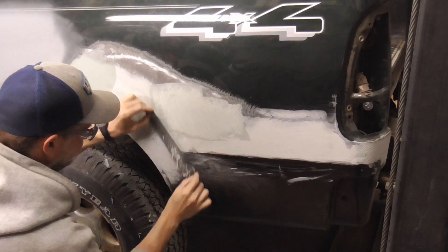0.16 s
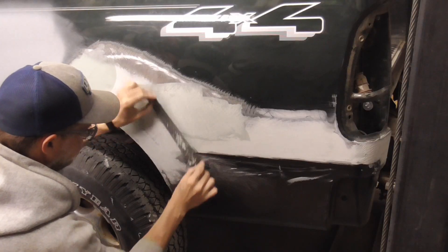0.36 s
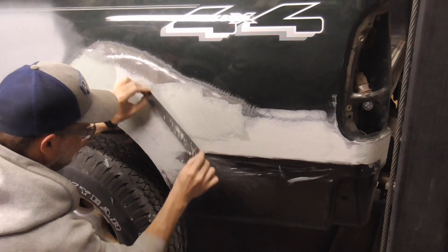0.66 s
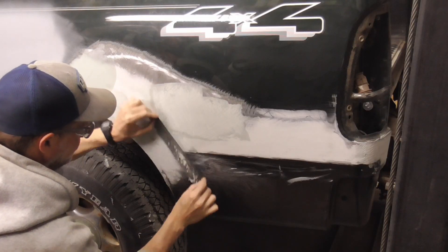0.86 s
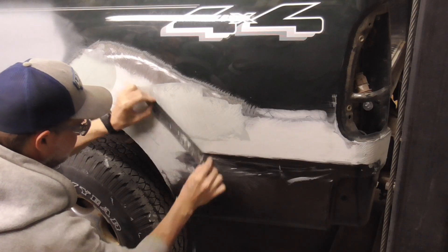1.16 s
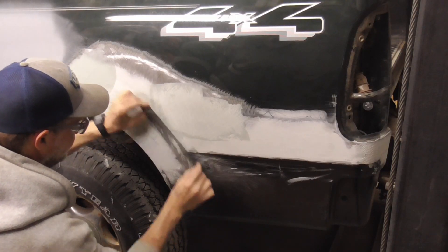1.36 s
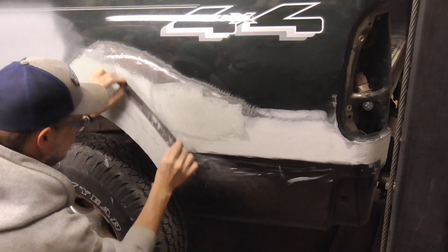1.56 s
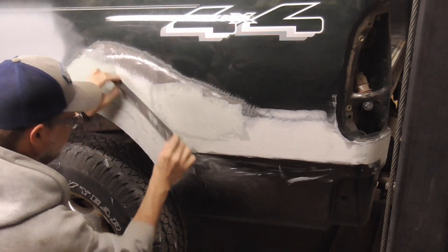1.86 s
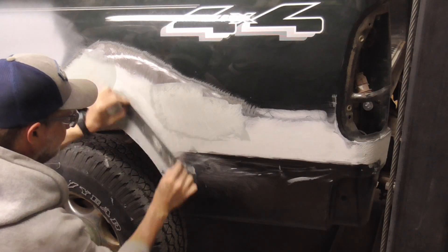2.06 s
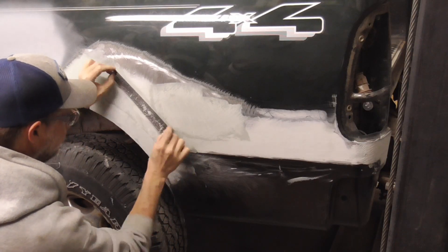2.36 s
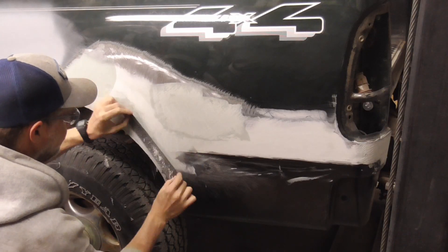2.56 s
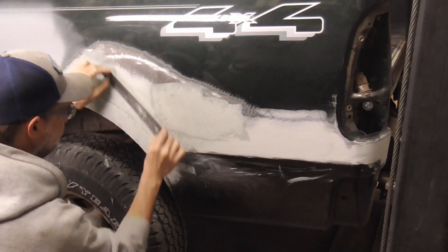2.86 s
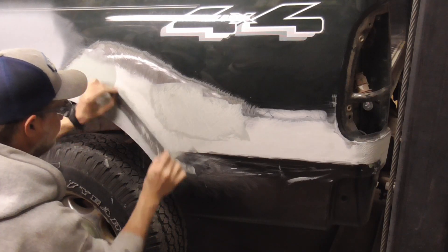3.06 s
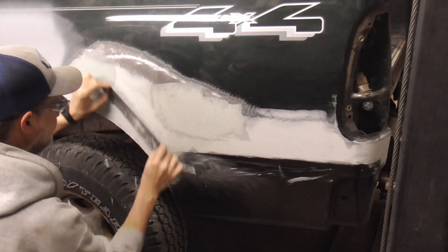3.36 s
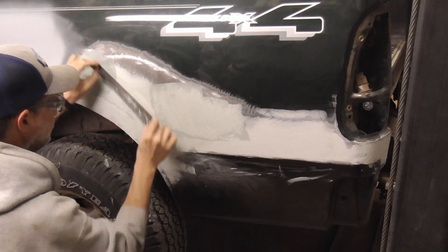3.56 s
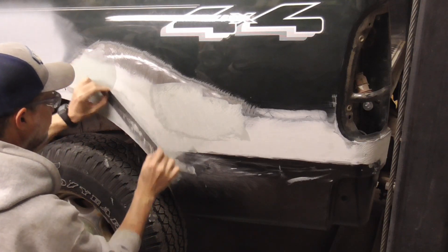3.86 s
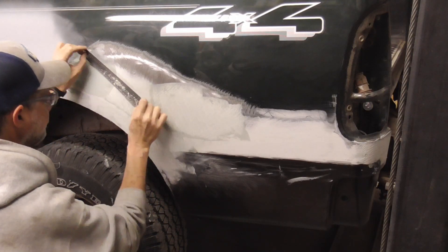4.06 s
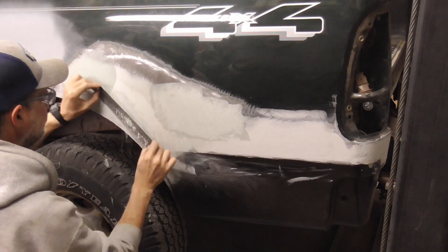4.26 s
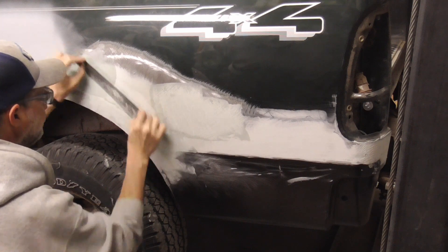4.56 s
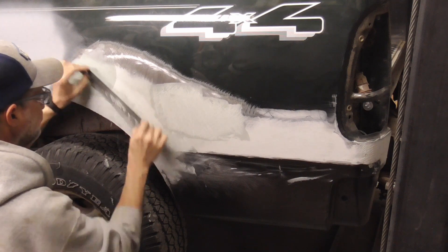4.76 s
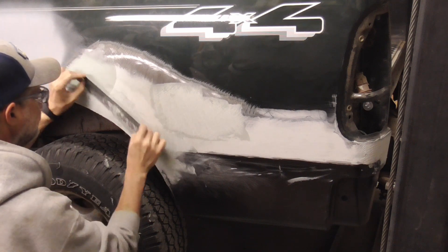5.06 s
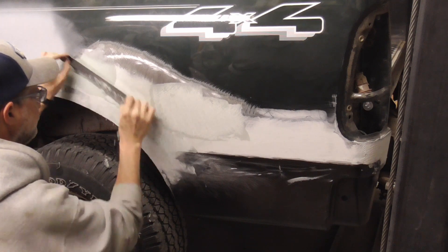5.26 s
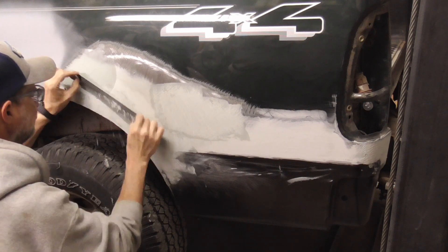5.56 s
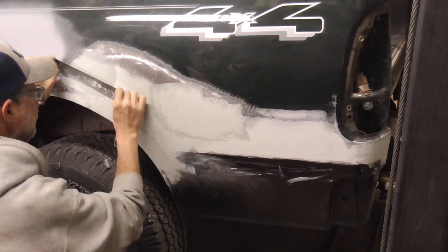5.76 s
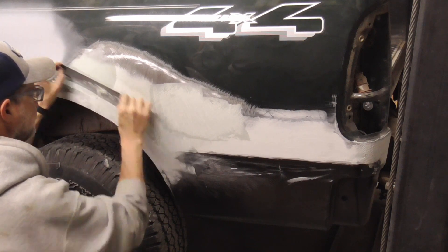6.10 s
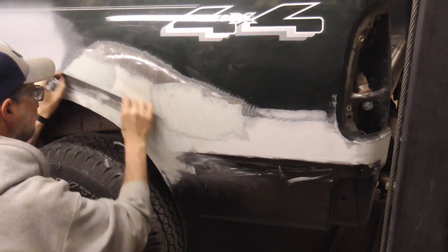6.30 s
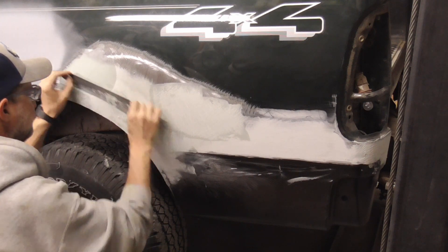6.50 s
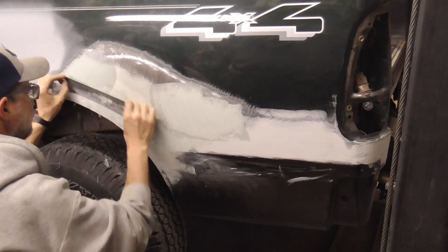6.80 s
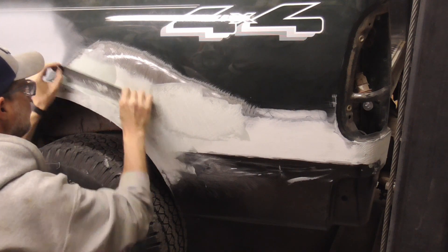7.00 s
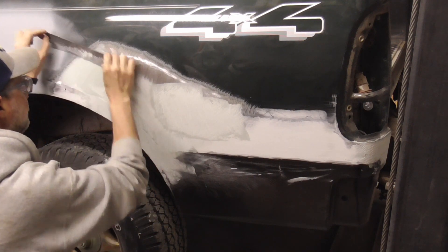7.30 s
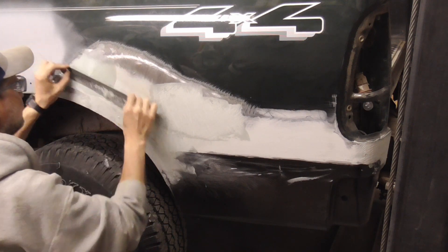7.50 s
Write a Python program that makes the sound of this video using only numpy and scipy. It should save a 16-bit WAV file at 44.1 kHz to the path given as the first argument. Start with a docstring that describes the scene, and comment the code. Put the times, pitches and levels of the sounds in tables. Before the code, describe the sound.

From the very start, a hand rasp scrapes across soft filler on a hollow steel vehicle panel, heard close up in stereo. The short strokes come a little over two per second. Most begin with a light, dull knock as the tool lands, then swell and fade as a gritty hiss with a thin blade ring, over a boxy panel tone that rises and sinks with each push. After a quick double stroke near 1.2 seconds, the scraping is at its brightest and strongest until about 4.4 seconds, with a sharper knock and brief stutter around 3.3 seconds. From about 5.5 to 7 seconds the strokes are a little softer and duller. At 7.2 seconds a tap leads into a few hurried scrapes and small knocks, ending around 7.6 seconds. Faint workshop air hiss, low rumble and motor hum run throughout, with little room echo.

```python
"""A perforated hand rasp is set down on a steel wing coated with soft filler and pushed across it,
stroke after stroke. Its landings and catching teeth force the hollow panel into damped modal vibration.
Chips torn from the filler sum to a hiss and excite the blade's resonances near 4 kHz. Behind it is a
workshop with an air hiss, rumble and a motor hum, all heard by a close pair of microphones."""
import sys
import numpy as np
from scipy import signal
from scipy.fft import rfft, irfft
from scipy.io import wavfile
from scipy.ndimage import uniform_filter1d

SR = 44100
rng = np.random.default_rng(int(sys.argv[2]) if len(sys.argv) > 2 else 0)


def file_out(sig):
    """Save sig as 16-bit WAV at sys.argv[1]."""
    # one column per channel
    cols = np.atleast_2d(sig).T
    # limit, then scale
    lim = np.clip(cols, -1, 1)
    pcm = np.round(lim * 32767).astype(np.int16)
    wavfile.write(sys.argv[1], SR, pcm)


N = 336924

# Pushes of the rasp, with relative levels; the last two columns centre the emphasis on the panel modes:
# start_s, time_to_full_speed_s, half_speed_rise_s, half_speed_fall_s, fall_exponent,
# contact_drag_db, tooth_load_db, shaving_db, blade_db, contact_tone_hz, full_speed_tone_hz
STROKES = [(0.035, 0.097, 0.036, 0.076, 1.8, -38, -33, -43, -47, 347, 560.0),
           (0.485, 0.064, 0.048, 0.076, 1.85, -35.5, -31.5, -43.5, -44.5, 490, 520),
           (0.873, 0.073, 0.03, 0.065, 1.7, -36.5, -30.5, -42.5, -44, 440, 510.0),
           (1.125, 0.068, 0.029, 0.032, 0.99, -40, -32.5, -48, -45.5, 398, 445),
           (1.275, 0.067, 0.025, 0.035, 1.1, -40, -26, -34.5, -36, 520, 840.0),
           (1.662, 0.1, 0.037, 0.059, 1.55, -30.5, -28.5, -35.5, -36, 350, 855),
           (2.069, 0.13, 0.048, 0.05, 1.58, -28.5, -26.5, -32.5, -36.5, 366, 730),
           (2.519, 0.13, 0.066, 0.042, 1.43, -25.5, -27.5, -33, -36, 513, 740.0),
           (2.971, 0.078, 0.04, 0.062, 1.53, -28, -28, -35, -42.5, 390, 694),
           (3.34, 0.021, 0.018, 0.036, 1.4, -33.5, -25, -43.5, -42, 540, 610),
           (3.426, 0.057, 0.037, 0.056, 1.57, -36, -26.5, -34.5, -38.5, 590, 790),
           (3.794, 0.088, 0.032, 0.067, 1.6, -32, -29, -37.5, -40.5, 450, 710),
           (4.213, 0.089, 0.033, 0.066, 1.68, -37, -28, -36.5, -40.5, 400, 890),
           (4.657, 0.091, 0.052, 0.06, 1.78, -41, -31.0, -40, -43, 580, 800.0),
           (5.071, 0.089, 0.041, 0.05, 1.55, -33.5, -28.5, -40.5, -47, 540, 740.0),
           (5.478, 0.13, 0.054, 0.054, 1.66, -32.5, -35, -45.5, -53.5, 375, 550),
           (5.901, 0.13, 0.053, 0.056, 1.48, -37.5, -33.5, -43, -55, 420, 633),
           (6.258, 0.01, 0.012, 0.025, 1.5, -64, -65, -56, -62, 375, 380.0),
           (6.341, 0.14, 0.057, 0.055, 1.5, -53.5, -32.5, -42, -47.5, 350, 795),
           (6.752, 0.19, 0.058, 0.057, 1.76, -35, -32, -42.5, -54, 375, 640.0),
           (7.193, 0.011, 0.013, 0.025, 1.3, -36, -31, -43, -55, 540, 560),
           (7.305, 0.047, 0.027, 0.037, 1.3, -51, -30.5, -46, -50, 550, 527),
           (7.405, 0.066, 0.027, 0.051, 1.9, -28, -28, -40, -42, 650, 710),
           (7.522, 0.1, 0.084, 0.13, 1.6, -61, -37.5, -44, -57, 680, 636)]
# Landings and jolts of the rasp: time_s, relative_impulse_db, contact_ms
IMPACTS = [(0.033, -18, 2.1), (0.486, -16, 1.24), (0.876, -13.5, 1.1), (1.662, -15, 1.5),
           (2.07, -14.5, 0.98), (2.52, -16.5, 0.34), (2.667, -36, 1.4), (2.972, -13, 1.06),
           (3.34, -10, 1.2), (3.371, -18.5, 0.37), (3.43, -20, 1.1), (3.795, -17.5, 1.3), (3.83, -21, 0.96),
           (4.214, -27, 0.77), (4.256, -35, 1.7), (4.658, -21, 1.34), (5.073, -17, 0.93),
           (5.478, -20.5, 0.93), (5.513, -15.5, 1.8), (5.898, -24, 2.1), (6.342, -23, 2.6),
           (6.369, -21, 2.5), (7.193, -21.5, 0.59), (7.552, -25, 1.2), (7.617, -17.5, 0.91)]
# Normal modes of the panel: pitch_hz, relative_level_db, t60_s (capped at FILLER_T60_S)
PANEL_MODES = [(138.7, -5, .1), (200, -45, 0.091), (257.3, -2, 0.11), (270.2, -4, 0.084), (337.4, 2, 0.037),
               (377, -1, 0.037), (397.6, -3, 0.097), (450, -3.5, 0.026), (517, -3, 0.042), (578.4, -9, .07),
               (618, -3.5, 0.042), (678, -3.5, 0.043), (740, -1.5, 0.05), (770, 1, 0.024),
               (909.4, -2, 0.048), (921, -4.5, .07), (1043, 2.5, 0.016), (1086, -4.5, 0.14),
               (1122, 1, 0.015), (1275, -9, 0.052), (1358, -11, 0.11), (1520, -18, 0.098),
               (1400, -34, 0.066)]
# Resonances of the blade: pitch_hz, stage_bandwidth_hz, relative_level_db
BLADE_MODES = [(3694, 370, 2), (3902, 280, 3.5), (4160, 440, 0.5)]
# Spectral density of the chip noise: frequency_hz, relative_level_db
CHIP_SPECTRUM = [(900, 4), (1600, -3), (2100, 2), (3000, 0), (3800, 1), (5000, -1.5), (6100, -5),
                 (6800, -1.5), (8500, -4.5), (10500, -0.5), (12500, -2), (14500, -6.5), (15600, -18)]
# Spectral density of the air hiss and rumble: frequency_hz, relative_level_db
AIR_SPECTRUM = [(25, -33), (64, 3), (129, 5), (190, 9), (359, 8), (480, 4), (1200, -3), (1700, -12),
                (2700, -12), (3500, -3.5), (5600, -13), (6800, -2.5), (8000, -4.5), (9500, -7.5),
                (13000, -7), (15600, -18.5)]
# Partials of the motor hum: pitch_hz, bandwidth_hz, level_db
HUM_PARTIALS = [(61.7, 4, -63.5), (123.4, 18, -58), (348.4, 5, -58)]
# Gain of the stereo side signal: frequency_hz, gain_db
SIDE_GAIN = [(60, -14), (125, -17), (250, -11), (500, -8), (1000, -7), (2000, -7), (4000, -5.5),
             (8000, -1.6), (13000, -3.5)]
# Balance of the mid signal between the channels: frequency_hz, left_minus_right_db
BALANCE = [(100, 1), (400, -0.3), (1000, -2), (3000, -0.7), (8000, -1), (14000, -4)]
# Decay of reflections from the room and from nearby surfaces: frequency_hz, t60_s
ROOM_DECAY = [(200, 0.35), (1400, 0.16), (9700, 0.09)]
NEARBY_DECAY = [(200, 0.041), (1500, 0.12)]

CHIPS_PER_S, CHIP_SPREAD_DB = 6300, -1.5
FILLER_T60_S = .065  # the soft filler lets no panel mode ring longer
LOAD_EXPONENT, LOAD_LAG_S = 0.65, 0.0012  # the tooth load follows the speed gently
DRAG_DB_PER_S, SEATING_S = 129, 0.0063  # contact drag dies away; the teeth take time to seat
BLADE_LEAD_S = 0.0096  # the blade sings most while the teeth dig in
REST_HZ = 375.  # the panel tone sinks to this as the push slows


def amp(db):
    """Amplitude ratio of a level in decibels."""
    return 10 ** (np.asarray(db) / 20)


def unit_rms(x):
    """Normalisation to unit mean power."""
    return x / np.sqrt(np.mean(x ** 2) + 1e-20)


def curve_at(points, hz):
    """Interpolation on a logarithmic frequency axis."""
    f, value = np.transpose(points)
    return np.interp(np.log(hz + 1), np.log(f + 1), value)


def coloured(x, points):
    """Linear filtering by a gain curve in decibels."""
    return irfft(rfft(x) * amp(curve_at(points, np.fft.rfftfreq(N, 1 / SR))), N)


def resonate(x, hz, width_hz):
    """Forced response of a damped oscillator whose natural frequency may vary."""
    phasor = np.exp(2j * np.pi * np.cumsum(hz * np.ones(N)) / SR)
    return (phasor * signal.lfilter([1], [1, -np.exp(-np.pi * width_hz / SR)], x / phasor)).imag


def drift(per_s):
    """Slow random modulation of unit rms."""
    knots = rng.standard_normal(int(N / SR * 60))
    return unit_rms(np.interp(np.arange(N) * per_s / SR, np.arange(len(knots)), knots))


def shot_noise(per_s, spread_db):
    """A Poisson train of impulses of random sign and size."""
    chance, size, sign = rng.random(N), rng.exponential(1, N), rng.choice([-1., 1.], N)
    return unit_rms(sign * amp(spread_db * np.minimum(size, 5)) * (chance < per_s / SR))


def workshop(air_db=-50, swell_db=.7):
    """Broadband noise gives air hiss and rumble; narrowband noise gives a wavering motor hum."""
    air = amp(air_db + swell_db * drift(6.)) * unit_rms(coloured(rng.standard_normal(N), AIR_SPECTRUM))
    hum = sum(amp(db) * unit_rms(resonate(rng.standard_normal(N), hz, width))
              for hz, width, db in HUM_PARTIALS)
    return air + hum


def reflections(x, decay, delay_samples, fades_per_s, paths=3):
    """Multipath propagation: each band decays at its own rate, and paths crossfade as the hands move."""
    out, slots = np.zeros(N), np.arange(delay_samples, SR // 3 - 20, 10)
    for k in range(paths):
        taps = np.zeros(SR // 3)
        taps[slots + rng.integers(0, 10, len(slots))] = rng.choice([-1., 1.], len(slots))
        hz, t, spectra = signal.stft(taps, SR, nperseg=128)
        tail = signal.istft(spectra * amp(-60 * t / curve_at(decay, hz)[:, None]), SR, nperseg=128)[1]
        share = np.sqrt(2 / paths) * np.cos(np.pi * (fades_per_s * np.arange(N) / SR + k / paths))
        out += signal.fftconvolve(x * share, tail / np.linalg.norm(tail))[:N]
    return out


def speed_db(t, top_s, rise_s, fall_s, fall_exponent):
    """Velocity arch of a push: 0 dB at top_s, halved rise_s before it and fall_s after it."""
    before, after = np.maximum(top_s - t, 0) / rise_s, np.maximum(t - top_s, 0) / fall_s
    return -20 * np.log10(2) * (before ** 2.4 + after ** fall_exponent)


def stroke_envelopes():
    """Power laws of speed set the tooth load, the chip and blade amplitudes and the panel tone."""
    curves = np.zeros((4, N))
    for start_s, *arch, drag_db, load_db, chip_db, blade_db, contact_hz, top_hz in STROKES:
        load, chips, blade, shift_hz = curves[:, round(start_s * SR):][:, :SR // 2]
        t = np.arange(len(load)) / SR
        rising = t < arch[0]
        cutting = amp(load_db + LOAD_EXPONENT * speed_db(t - LOAD_LAG_S, *arch))
        drag = amp(drag_db - DRAG_DB_PER_S * t)
        load += (cutting + drag) * np.minimum(t / SEATING_S, 1)
        chips += amp(chip_db + speed_db(t, *arch))
        # exponents above 1: the blade goes quiet first as the push slows
        blade += amp(blade_db + np.where(rising, 1.28, 1.4) * speed_db(t + BLADE_LEAD_S, *arch))
        # exponents below 1: the tone climbs early, while the push gathers speed
        climb = amp(np.where(rising, 0.73, 0.68) * speed_db(t, *arch))
        slow_hz = np.where(rising, contact_hz, REST_HZ)
        shift_hz[:] = slow_hz + (top_hz - slow_hz) * climb - REST_HZ
    load, chips, blade, shift_hz = uniform_filter1d(curves, size=60)
    return load, chips, blade, REST_HZ + shift_hz


def blade_ring(envelope):
    """Resonance: chips excite the thin steel blade; two stages in cascade steepen each peak."""
    chips = shot_noise(CHIPS_PER_S, CHIP_SPREAD_DB)
    modes = sum(amp(db) * unit_rms(resonate(resonate(chips, hz, width), hz, width))
                for hz, width, db in BLADE_MODES)
    return envelope * unit_rms(modes)


def shaving_hiss(envelope, patch_db=2.5, gain_db=3.5):
    """Shot noise of torn-off chips; random level patches in time and frequency add a slight flutter."""
    chips = coloured(shot_noise(CHIPS_PER_S, CHIP_SPREAD_DB), CHIP_SPECTRUM)
    hz, t, spectra = signal.stft(chips, SR, nperseg=512, noverlap=384)
    patches = uniform_filter1d(rng.standard_normal(spectra.shape), size=3, axis=0)
    patches = unit_rms(uniform_filter1d(patches, size=12, axis=1))
    # fast cuts tear finer chips, so the spectrum tilts upward with level
    level_db = np.interp(t, np.arange(N) / SR, 20 * np.log10(envelope + 1e-6))
    db_per_octave = 0.19 * np.clip(level_db + 40, -6, 20)
    tilt_db = np.outer(np.log2((hz + 100) / 7000), db_per_octave)
    hiss = signal.istft(spectra * amp(patch_db * patches + tilt_db), nperseg=512, noverlap=384)[1][:N]
    return envelope * amp(gain_db) * unit_rms(hiss)


def contact_force(load):
    """Impulsive excitation: teeth catch at random, and each landing or jolt adds a smooth force pulse."""
    catches = shot_noise(per_s=1200., spread_db=2.5) * load
    blows = np.zeros(N)
    for time_s, db, contact_ms in IMPACTS:
        pulse = np.sin(np.pi * np.arange(0, 1, 1000 / SR / contact_ms)) ** 2
        blows[round(time_s * SR) - len(pulse) // 2:][:len(pulse)] += amp(db) * pulse / pulse.sum()
    return amp(-34) * catches + amp(-15) * blows


def panel_ring(force, tone_hz, lift_db=10, lift_octaves=0.9, wander_db=1.5):
    """Modal superposition: the hollow panel rings as damped modes, those near tone_hz emphasised."""
    out = np.zeros(N)
    for k, (hz, db, t60_s) in enumerate(PANEL_MODES):
        nearness = np.exp(-.5 * (np.log2(hz / tone_hz) / lift_octaves) ** 2)
        swell_db = wander_db * drift(25.)  # the blade moves over the mode's nodes
        drive = force * amp(db + lift_db * nearness + swell_db)
        bent_hz = hz * (1 + .012 * drift(4.))  # pressing on the panel detunes the mode
        width_hz = np.log(1000) / np.pi / min(t60_s, FILLER_T60_S)
        out += (-1) ** k * resonate(drive, bent_hz, width_hz)  # neighbours start in antiphase
    return out


def rasp(panel, chip_envelope, blade_envelope, cutoff_hz=215, room_db=-9):
    """Radiation of panel, chips and blade, inefficient below the cutoff, with room reverberation."""
    sources = panel + shaving_hiss(chip_envelope) + blade_ring(blade_envelope)
    direct = signal.sosfilt(signal.butter(4, cutoff_hz, "high", fs=SR, output="sos"), sources)
    return direct + amp(room_db) * reflections(direct, ROOM_DECAY, delay_samples=300, fades_per_s=1.294)


def scene():
    """Mid-side stereo: the side carries scattered panel sound, other teeth and the diffuse workshop."""
    load, chip_envelope, blade_envelope, tone_hz = stroke_envelopes()
    panel = panel_ring(contact_force(load), tone_hz)
    mid = rasp(panel, chip_envelope, blade_envelope) + workshop()
    scattered = reflections(panel, NEARBY_DECAY, delay_samples=0, fades_per_s=8.)
    side = coloured(rasp(scattered, chip_envelope, blade_envelope) + workshop(), SIDE_GAIN)
    left_gain, right_gain = np.array(BALANCE) * [1, .5], np.array(BALANCE) * [1, -.5]
    return np.array([coloured(mid, left_gain) + side, coloured(mid, right_gain) - side])


def record(dry):
    """Band limiting: the microphones' bass roll-off, then a steep low-pass filter."""
    bass_hz, edge_hz = 46, 15690
    thinned = signal.sosfilt(signal.butter(2, bass_hz, "high", fs=SR, output="sos"), dry)
    low_pass = signal.firwin(1023, edge_hz, window=("kaiser", 9), fs=SR)
    return signal.oaconvolve(thinned, low_pass[None], "same")


dry = scene()
out = record(dry)
file_out(out)
```